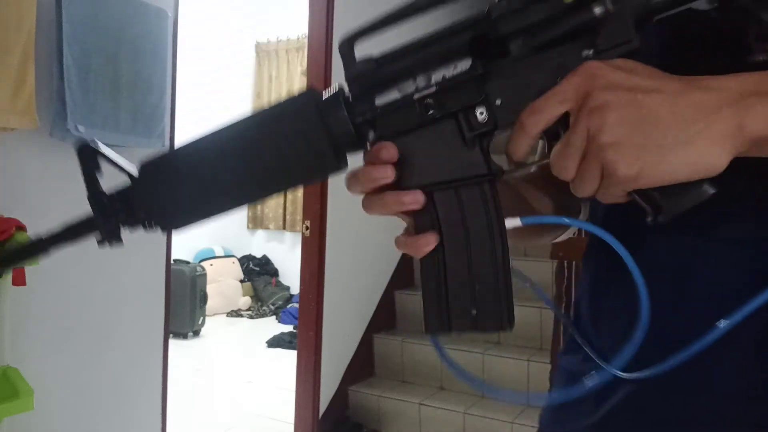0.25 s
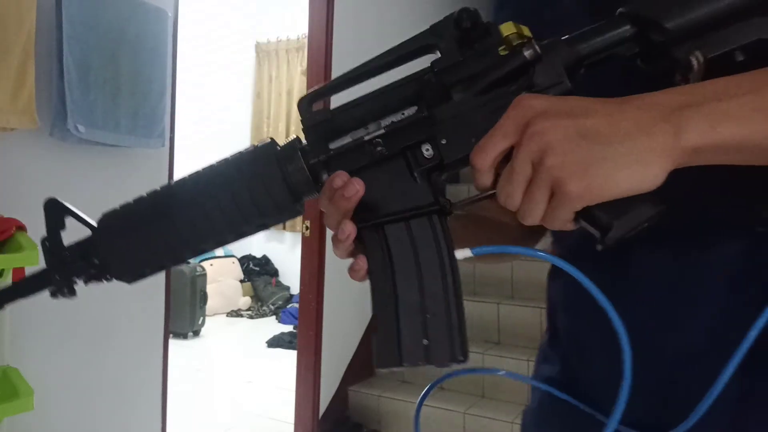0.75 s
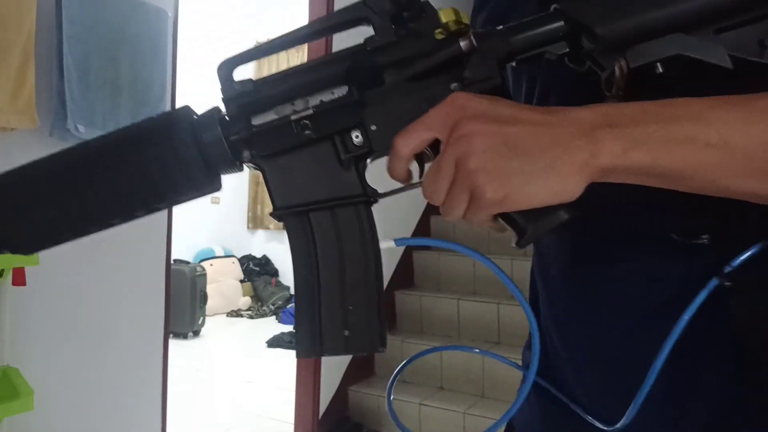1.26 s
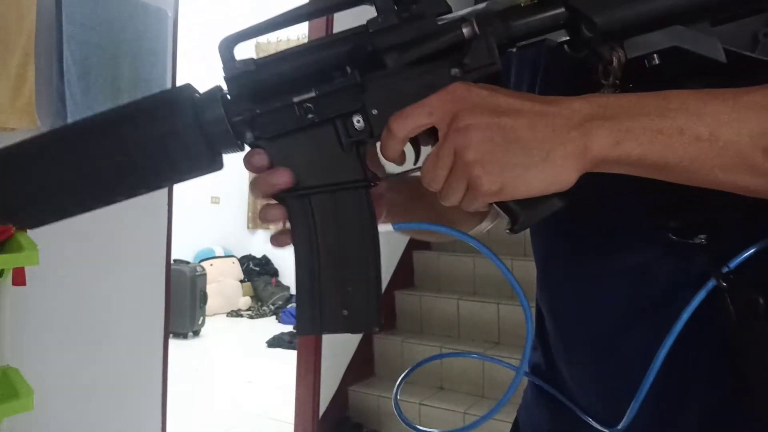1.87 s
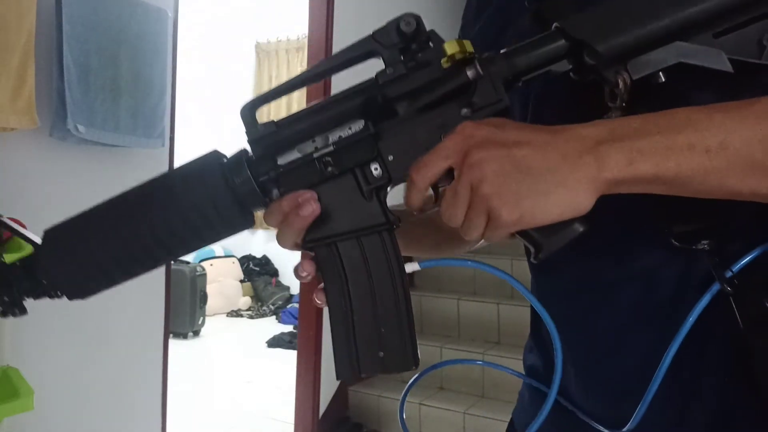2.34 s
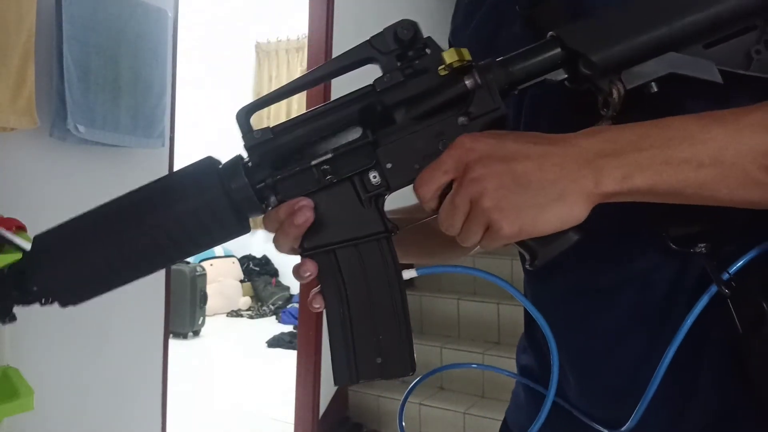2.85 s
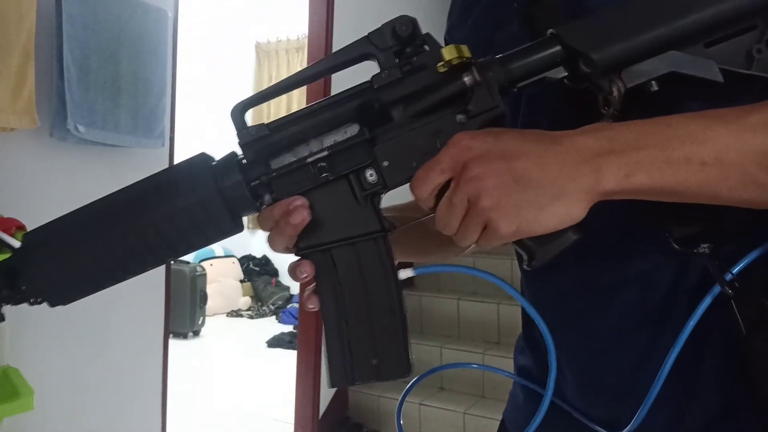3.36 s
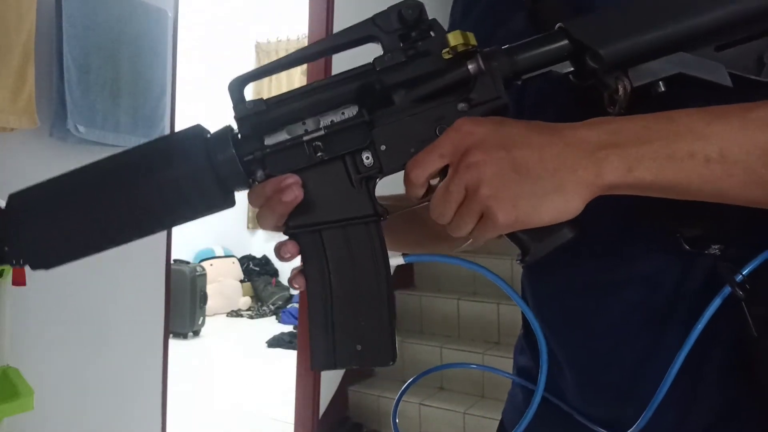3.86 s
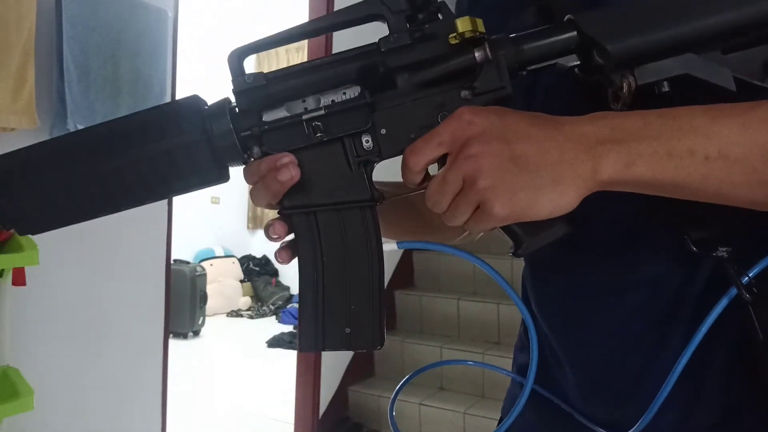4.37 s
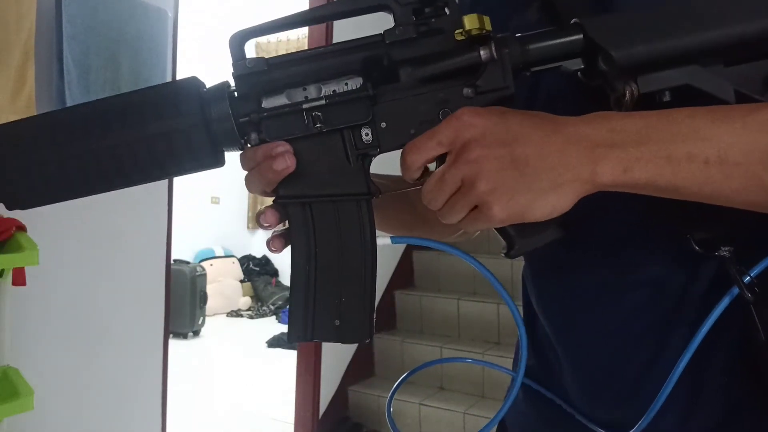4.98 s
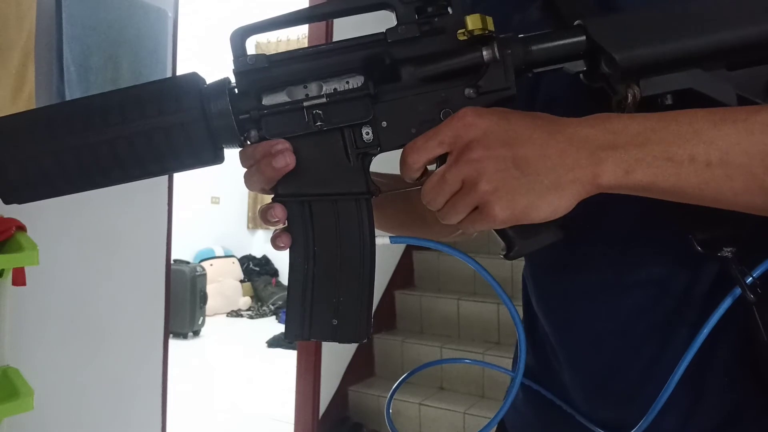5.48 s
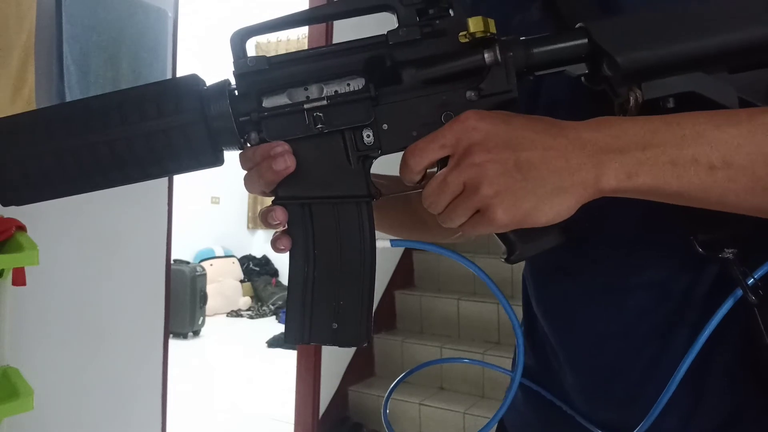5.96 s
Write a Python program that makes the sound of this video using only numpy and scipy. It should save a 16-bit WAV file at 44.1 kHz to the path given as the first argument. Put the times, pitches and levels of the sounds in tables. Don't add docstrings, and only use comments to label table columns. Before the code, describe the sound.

Close to the microphone, an air-driven toy rifle is handled with small ticks over a faint fan hum. Its handle is scraped back with a bright rattle, then snaps forward. Six sharp air shots follow at a steady pace, just over half a second apart, each with a bolt clacking back and slamming home. Hard tiled walls add a short, dense echo.

```python
import sys
import numpy as np
from scipy import signal
from scipy.fft import rfft, irfft, next_fast_len
from scipy.io import wavfile
from scipy.ndimage import uniform_filter1d, minimum_filter1d

SR = 44100
rng = np.random.default_rng(int(sys.argv[2]) if len(sys.argv) > 2 else 0)


def attenuation_scalar(level_db):
    decades = np.asarray(level_db, float) / 20
    return 10 ** decades


def master(y):
    cut = np.clip(np.atleast_2d(y).T, -1, 1)
    pcm = np.round(cut * 32767)
    wavfile.write(sys.argv[1], SR, pcm.astype(np.int16))


N = 274302
LEAD = 22050
TOTAL = N + LEAD


def evened(x):
    return x / np.sqrt(np.mean(x ** 2) + 1e-20)


def read(points, hz):
    f, value = np.transpose(points)
    return np.interp(np.log(hz + 1), np.log(f + 1), value)


def rings(modes, seconds):
    t = np.arange(int(seconds * SR)) / SR
    return sum(attenuation_scalar(db - 60 * t / t60) * np.sin(2 * np.pi * hz * t) for hz, db, t60 in modes)


def colour(points):
    log_gain = np.log(attenuation_scalar(read(points, abs(np.fft.fftfreq(4096, 1 / SR)))))
    taps = np.fft.ifft(np.exp(np.conj(signal.hilbert(log_gain)))).real[:2048]
    return taps / np.linalg.norm(taps)


def smoothed(x, first, second):
    return uniform_filter1d(uniform_filter1d(x, size=first, axis=0), size=second, axis=1)


# (frequency [Hz], coherence [0-1])
LIKENESS = [(60, 1), (180, 0.67), (500, 0.36), (1500, 0.05), (5000, 0.031)]
# (frequency [Hz], density [dB per Hz])
FAN_NOISE = [(25, -51), (45, -22), (65, -11.5), (120, -13), (190, -9.5), (300, -11.5), (500, -12),
             (900, -17), (2000, -19), (4500, -23), (8000, -23), (16000, -38)]
# (frequency [Hz], level [dB rms])
HUM_LINES = [(188.4, -49), (215.3, -66), (306.8, -56.5), (355.3, -60), (468.3, -58)]
# (time [s], frequency [Hz])
BLADE_PITCH = [(0, 118.0), (2.6, 117.4), (4.5, 116.7), (5.6, 117.4), (6.2, 118.1)]


def background():
    frames, hz = TOTAL // 512 + 5, np.fft.rfftfreq(2048, 1 / SR)
    a, b, c, d, patches = rng.standard_normal((frames, len(hz), 5)).T
    patches = evened(smoothed(patches, 20, 8))
    same = np.clip(read(LIKENESS, hz), -1, 1)[:, None]
    left, other = a + 1j * b, c + 1j * d
    z = np.array([left, same * left + np.sqrt(1 - same ** 2) * other])
    z *= attenuation_scalar(read(FAN_NOISE, hz)[:, None] + 1.75 * patches)
    noise = signal.istft(z, nperseg=2048, noverlap=1536)[1][:, :TOTAL]
    air = attenuation_scalar(-42) * evened(noise)

    t = (np.arange(TOTAL) - LEAD) / SR
    air += np.sqrt(2) * attenuation_scalar(-52.5) * np.cos(2 * np.pi * (120 * t + .39))
    turns = np.cumsum(np.interp(t, *np.transpose(BLADE_PITCH))) / SR
    blades = np.cos(2 * np.pi * (-.3 + turns - turns[LEAD]))
    air += np.sqrt(2) * attenuation_scalar(-56 + 1.0 * t) * blades

    slow = np.arange(-1, 7, .01)
    for line_hz, db in HUM_LINES:
        rates_hz = np.geomspace(.5, 6, num=12)
        waver = sum(np.sin(2 * np.pi * (f * slow + rng.random())) / np.sqrt(f) for f in rates_hz)
        waver = np.interp(t, slow, evened(waver))
        tone = np.sin(2 * np.pi * (line_hz * t + 0.069 * waver))
        air += np.sqrt(2) * attenuation_scalar(db + 2.44 * waver) * tone
    return air


def blows(rows, spectrum, body, strength_db, thump_db, knock_db, t60, feed_db,
          thumps=1, knocks=1, delay_s=0, bounce=0):
    out, t, taps = np.zeros((4, TOTAL)), np.arange(4410) / SR, colour(spectrum)
    ring = attenuation_scalar(-5.5) * rings(body, .2)
    ring *= 1 - np.exp(-np.arange(len(ring)) / SR / 0.0011)
    ring += bounce * attenuation_scalar(0.5) * np.roll(ring, round(0.0065 * SR))
    rise = .1 * t60
    for s, db, weight_db, pan_db in rows:
        at = LEAD + round(s * SR)
        gains = attenuation_scalar(db + strength_db + np.array([[pan_db / 2], [-pan_db / 2], [feed_db]]))
        grit = rng.standard_normal((4, len(t)))
        rattle_db = 5.54 * evened(uniform_filter1d(grit[3], size=60))
        shape = attenuation_scalar(rattle_db - 60 * t / t60) * np.minimum(t / rise, 1) ** 2
        burst = shape * (0.84 * grit[2] + 0.75 * grit[[0, 1, 1]])
        burst[2] = np.linalg.norm(shape) * (np.arange(len(t)) == round(rise * SR))
        burst = gains * signal.fftconvolve(burst, taps[None], axes=1)
        start = at - round(.7 * rise * SR)
        out[:3, start:start + burst.shape[1]] += burst

        at += round(delay_s * SR)
        ring_gains = attenuation_scalar(knock_db + knocks * weight_db + np.array([[0], [0], [-8]]))
        out[:3, at:at + len(ring)] += gains * ring_gains * ring
        out[3, at] += attenuation_scalar(db + strength_db + thump_db + thumps * weight_db)
    return out


# (frequency [Hz], level [dB], t60 [s])
METAL_BODY = [(898, -6.5, .04), (1045, -3, 0.038), (1123, -5, 0.03), (1515, -10, 0.017)]
# (frequency [Hz], density [dB per Hz])
SMALL_PARTS = [(200, -31), (500, -11), (1000, -8), (2300, -4.5), (3900, 0), (5000, 1.5), (7000, 6),
               (12000, -1.5), (16000, -6)]
# (time [s], peak [dB], weight [dB], left-right [dB])
LATCH_STRIKES = [
    (-.04, 1, -15, 1),
                 (1.3972, -8.5, 1.5, -4.5),
    (1.4192, -4, 0, -2),
    (1.4245, -13.5, 0, 8),
    (1.4385, -15.5, -5.5, -10),
    (1.457, -17, 0, 8),
    (1.468, -21, 3, -4),
    (1.4894, -30, 4, -4),
    (2.2308, -4, -17, 2),
]


def cocking():
    return blows(LATCH_STRIKES, SMALL_PARTS, METAL_BODY, strength_db=5, thump_db=-40,
                 knock_db=-11, t60=0.02, feed_db=-5, thumps=0)


# (frequency [Hz], t60 [s])
REVERBERATION = [(100, 1.4), (260, 0.92), (700, 1.04), (1840, 0.82), (4850, 0.68), (12800, 0.38)]


def stairwell(x):
    out, t_all = 0, np.arange(TOTAL) / SR
    for turn in range(3):
        taps = rng.choice([-1., 1.], (2, 40000)) * (rng.random((2, 40000)) < .3)
        hz, t, z = signal.stft(taps, SR, nperseg=256)
        same = np.clip(read(LIKENESS, hz), -1, 1)[:, None]
        z[1] = same * z[0] + np.sqrt(1 - same ** 2) * z[1]
        lumps = smoothed(rng.standard_normal(z.shape[1:]), 9, 5)
        z *= attenuation_scalar(3.8 * evened(lumps))
        decay = attenuation_scalar(-60 * t / read(REVERBERATION, hz)[:, None])
        tail = signal.istft(z * decay, SR, nperseg=256)[1]
        tail *= np.clip(np.arange(tail.shape[1]) / SR / 0.0044 - .3, 0, 1)
        tail /= np.linalg.norm(tail[0])
        share = np.sqrt(2 / 3) * np.cos(2 * np.pi * (4.3 * t_all + turn / 3))
        out = out + signal.fftconvolve((share * x)[None], tail, axes=1)
    return out[:, :TOTAL]


# (frequency [Hz], level [dB], t60 [s])
ROOM_MODES = [(173.88, 1, 1.125), (250, -8.5, 0.58), (225.3, -8.5, 0.77), (642, -1.5, 0.26),
              (61.2, -22.5, 1.03), (70.4, -22.5, 0.42)]


def standing_waves(push):
    boom = rings(ROOM_MODES, 1.3)
    boom *= 1 - np.exp(-(np.arange(len(boom)) / SR / 0.021) ** 2)
    return attenuation_scalar(-10) * signal.fftconvolve(push, boom)[:TOTAL]


# (time [s], peak [dB], weight [dB], left-right [dB])
HANDLING_TICKS = [
    (0.5983, -34, -2, 14),
    (0.784, -32, 0, 7),
    (0.8742, -22, 0, -7),
    (0.8808, -22, -8, 14),
    (0.9997, -33, 13, 0.5),
    (1.004, -33.5, 10, 1.0),
    (1.3544, -47, 5, 7),
    (1.5828, -30, -2, 12),
]


def handling():
    return blows(HANDLING_TICKS, SMALL_PARTS, METAL_BODY, strength_db=2, thump_db=-22,
                 knock_db=-20, t60=0.015, feed_db=-3, thumps=0)


# (time [s], level [dB], ring [Hz])
HANDLE_SCRAPE = [
    (1.385, -45, 1250),
    (1.41, -30.5, 1220),
    (1.43, -29.5, 1100),
    (1.455, -27.5, 730),
    (1.47, -41.5, 660),
    (1.5, -50, 620),
]


def scrape():
    t = (np.arange(TOTAL) - LEAD) / SR
    s, *columns = np.transpose(HANDLE_SCRAPE)
    inside = np.flatnonzero((t > s[0]) & (t < s[-1]))
    db, hz = (np.interp(t[inside], s, c) for c in columns)
    grit = rng.standard_normal((3, len(inside)))
    db = db + 3.5 * evened(uniform_filter1d(grit[2], size=100))
    turn = np.exp(2j * np.pi * np.cumsum(hz) / SR)
    keep = np.exp(-np.pi * 220 / SR)
    ring = evened((turn * signal.lfilter([1 - keep], [1, -keep], grit[0] / turn)).real)
    hiss = attenuation_scalar(3) * signal.lfilter(colour(SMALL_PARTS), 1, grit[:2])
    out = np.zeros((2, TOTAL))
    out[:, inside] = attenuation_scalar(db) * (ring + hiss)
    return out


# (time [s], peak [dB], pitch [Hz], left-right [dB])
VALVE_POPS = [
    (2.208, -7, 1404, -7),
    (2.88, -8, 1400, -3),
    (3.453, -10, 1330, -1.0),
    (4.016, -11.5, 1330, 1),
    (4.587, -14.5, 1390, -19),
]


def pops():
    out, t = np.zeros((2, TOTAL)), np.arange(400) / SR
    for s, db, hz, pan_db in VALVE_POPS:
        at = LEAD + round((s + 0.00028) * SR)
        cycle = np.sin(2 * np.pi * hz * t) * np.exp(-(t * hz / 0.72 - 1.2) ** 2)
        cycle += attenuation_scalar(-1.5) * rng.standard_normal(len(t)) * attenuation_scalar(-60 * t / 0.0046)
        out[:, at:at + len(t)] += attenuation_scalar(db + 6 + np.array([[pan_db], [-pan_db]]) / 2) * cycle
    return out


# (frequency [Hz], density [dB per Hz])
BLAST_SPECTRUM = [(60, -34), (200, -15.5), (500, -2), (1000, -4.5), (2500, -4.8), (4300, -1), (7000, 4.5),
                  (12000, -8), (16000, -11)]
# (time [s], peak [dB], weight [dB], left-right [dB])
HANDLE_RELEASE = [
    (2.2586, -10, -3, 1),
    (2.2622, -6, -6, 1),
    (2.285, -17, -2, -1),
    (2.305, -17, -2, 2.0),
    (2.325, -18, 1, -1),
]


def release():
    return blows(HANDLE_RELEASE, BLAST_SPECTRUM, METAL_BODY, strength_db=5, thump_db=-40,
                 knock_db=-12, t60=0.035, feed_db=-1.5, thumps=0)


# (frequency [Hz], level [dB], t60 [s])
BARREL_MODES = [(255, 5.5, 0.056), (655, -1, 0.11), (527, -11.5, 0.11), (347, -2, 0.031),
                (34.8, -11.5, 0.086)]
# (time [s], peak [dB], weight [dB], left-right [dB])
AIR_BLASTS = [
    (2.822, -6.5, -8, 2.5),
    (3.3853, -5.5, -1.5, 3),
    (3.9474, -6.5, 0, 3),
    (4.5131, -9.5, 3, 0),
    (5.0434, -8.5, 4.5, 0.5),
    (5.6156, -7, 1, 1),
]


def shots():
    return blows(AIR_BLASTS, BLAST_SPECTRUM, BARREL_MODES, strength_db=7.5, thump_db=-12,
                 knock_db=-10.5, t60=0.062, feed_db=0, knocks=-.3, delay_s=0.008)


# (time [s], peak [dB], weight [dB], left-right [dB])
BOLT_BACK = [(2.9143, -2.5, -4, -4), (2.9292, -4, 6.5, -0.5), (2.9962, -3, -21, 5.2), (3.475, -6, 0, -5.8),
             (3.4871, -7, 11, 0.0), (4.0507, -3.5, 5.5, -0.35), (4.5749, -8, -3, 7),
             (4.6041, -12, -8, -5.2), (4.6147, -10, 3, -1.5), (5.12, -5, 5, 4.2), (5.1387, -5.5, -12, 0.37),
             (5.7005, -10, -25, -7.5), (5.7128, -5, 15, 4)]


def clacks():
    return blows(BOLT_BACK, BLAST_SPECTRUM, METAL_BODY, strength_db=0.5, thump_db=-19,
                 knock_db=-9, t60=0.032, feed_db=-0.5, knocks=.6)


# (time [s], peak [dB], weight [dB], left-right [dB])
BOLT_HOME = [
    (2.9496, -12.5, 3, 1.2),
    (3.5132, -7.5, 0, 0.87),
    (4.0871, -8.5, 1, 0.66),
    (4.6524, -7, 0.4, 1.4),
    (5.2091, -8, 0.5, 0.75),
    (5.8119, -8, -7, 1.2),
]


def slams():
    return blows(BOLT_HOME, BLAST_SPECTRUM, METAL_BODY, strength_db=1.5, thump_db=-2.5,
                 knock_db=4.3, t60=0.04, feed_db=-1.5, knocks=.3, bounce=0.94)


def scene():
    parts = cocking() + handling() + release() + shots() + clacks() + slams()
    rub, pop = scrape(), pops()
    near = parts[:2] + pop + rub
    near[1] = np.roll(near[1], 5)
    feed = parts[2] + attenuation_scalar(-14) * pop.mean(0) + attenuation_scalar(-12) * rub.mean(0)
    boom = standing_waves(parts[3])
    room = attenuation_scalar(2) * stairwell(feed) + [boom, np.roll(boom, 14)]
    return (near + room + background())[:, LEAD:]


def gap_gate(treble):
    power = (treble ** 2).mean(0)
    quick = abs(uniform_filter1d(power, size=128))
    slow = abs(uniform_filter1d(power, size=2048, origin=1000))
    jump = 1. * (quick > slow * attenuation_scalar(2 * 8))
    held = -minimum_filter1d(-jump, size=round(.02 * SR))
    return signal.oaconvolve(held, np.hanning(512) / 255.5, "same")


def top_cut(x):
    return signal.sosfilt(signal.butter(12, 16990, fs=SR, output="sos"), x)


# (frequency [Hz], gain [dB])
RESPONSE = [(20, -35), (70, -0.5), (4750, 0), (4900, -7.5), (5900, -8), (6150, 0), (8600, -3.5),
            (8700, -27), (11450, -52), (11600, -4), (15780, -0.5), (15920, -44), (17500, -86)]


def record(dry):
    keep = np.exp(-1 / (0.0021 * SR))
    power_db = 10 * np.log10(signal.lfilter([1 - keep], [1, -keep], (dry ** 2).mean(0)) + 1e-12)
    fall = np.arange(N) * 113.0 / SR
    over_db = np.maximum(np.maximum.accumulate(power_db + fall) - fall + 11.5, 0)
    keep = np.exp(-1 / (0.0001 * SR))
    ducked = np.tanh(dry / attenuation_scalar(0.37 * signal.lfilter([1 - keep], [1, -keep], over_db)))

    size = next_fast_len(N + 4096)
    hz = np.fft.rfftfreq(size, 1 / SR)
    heard = rfft(ducked, size) * attenuation_scalar(read(RESPONSE, hz))
    low = irfft(heard * (hz < 12500), size)[:, :N]
    top = irfft(heard * (hz >= 12500), size)[:, :N]
    gap = irfft(heard * (hz > 8680) * (hz < 11550), size)[:, :N]
    low = low - gap * (1 - attenuation_scalar(9.0) * gap_gate(top))
    flicker = (np.arange(N) / SR - .3159) % .04245 - .021
    mix = low + top * attenuation_scalar(5.6 * np.exp(-(flicker / 0.0033) ** 2))
    return top_cut(mix)


dry = scene()
out = record(dry)
master(out)
```